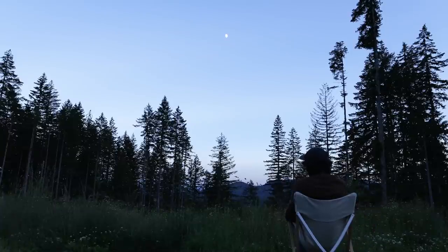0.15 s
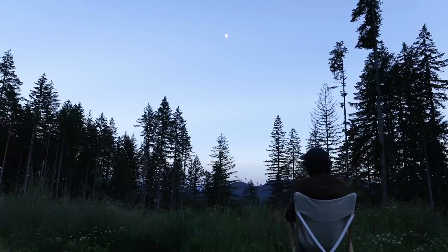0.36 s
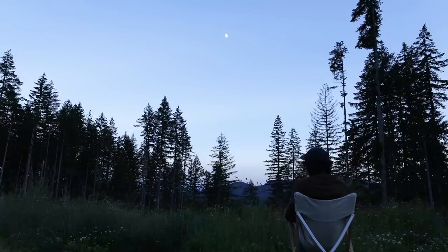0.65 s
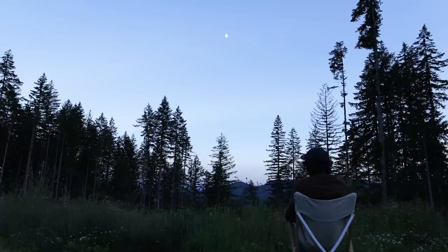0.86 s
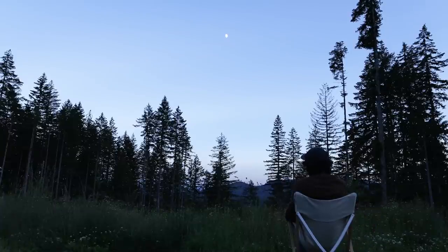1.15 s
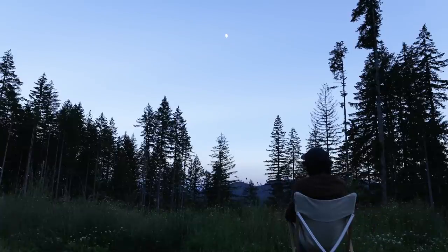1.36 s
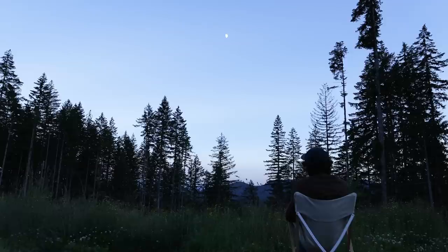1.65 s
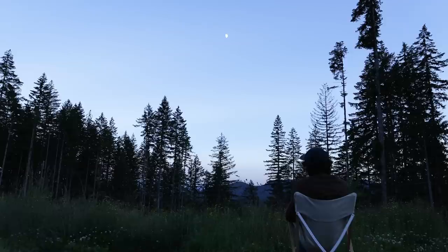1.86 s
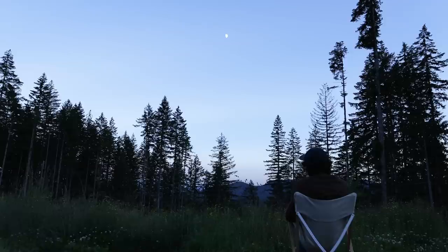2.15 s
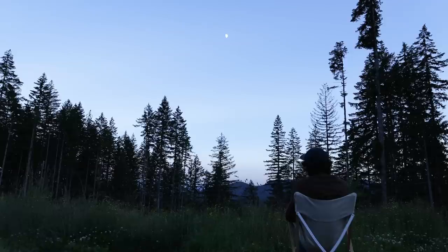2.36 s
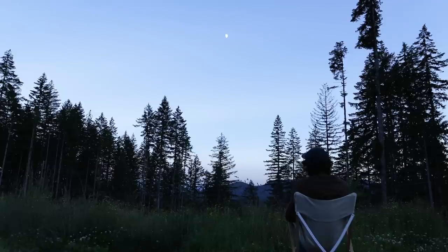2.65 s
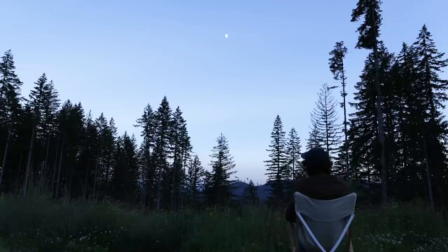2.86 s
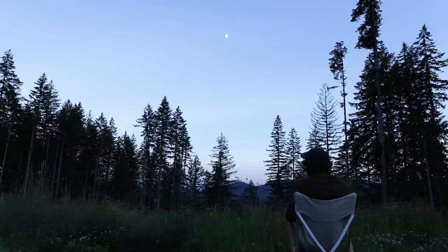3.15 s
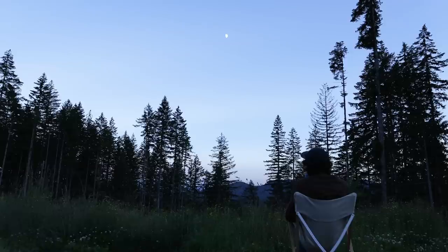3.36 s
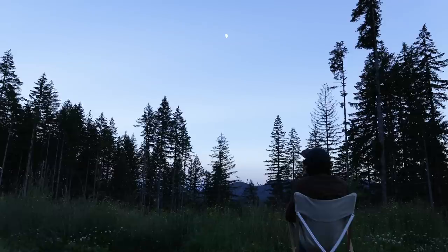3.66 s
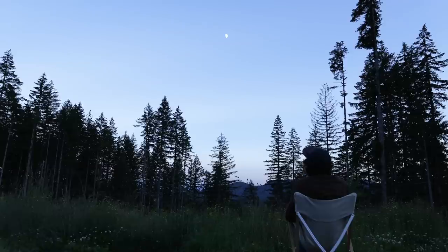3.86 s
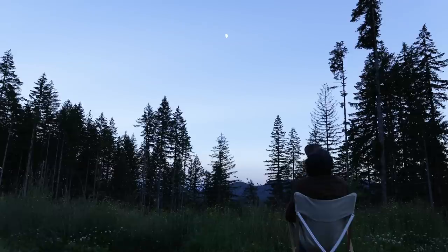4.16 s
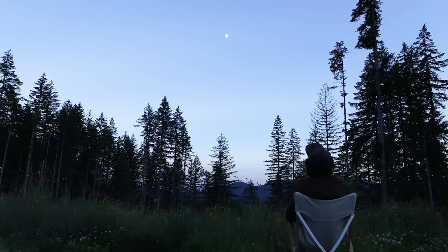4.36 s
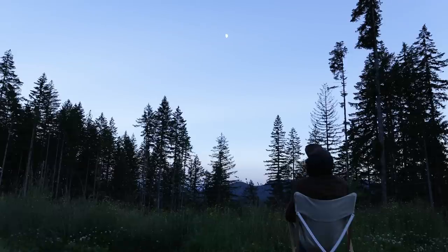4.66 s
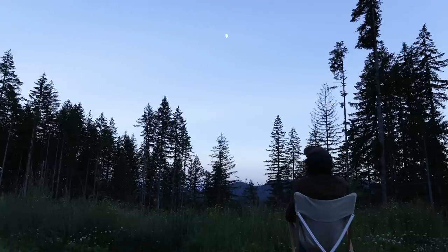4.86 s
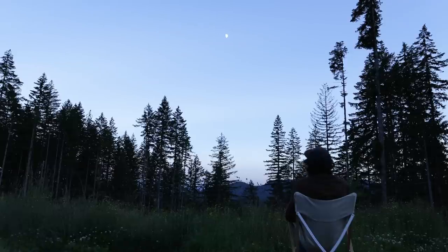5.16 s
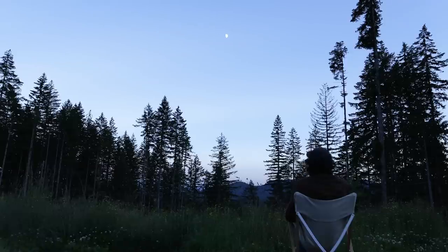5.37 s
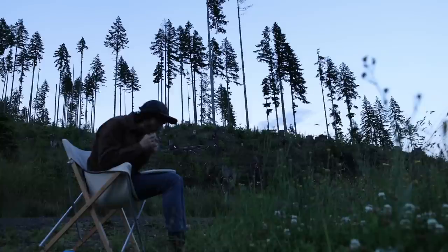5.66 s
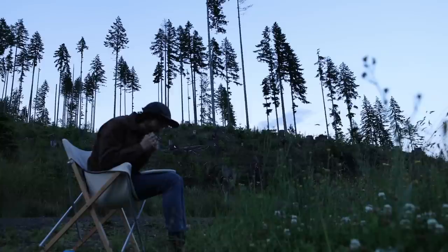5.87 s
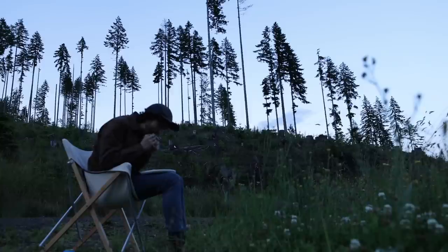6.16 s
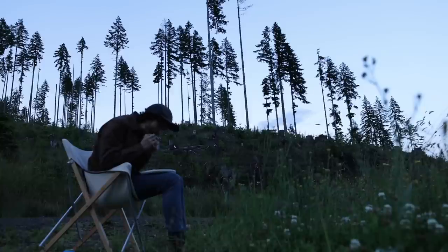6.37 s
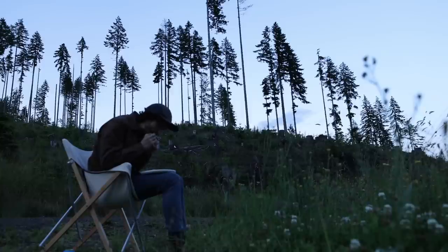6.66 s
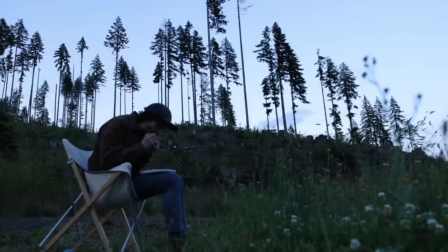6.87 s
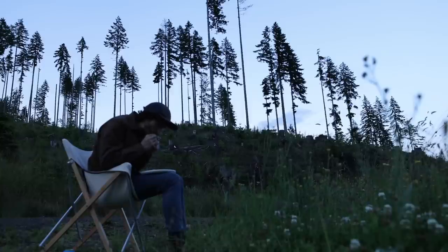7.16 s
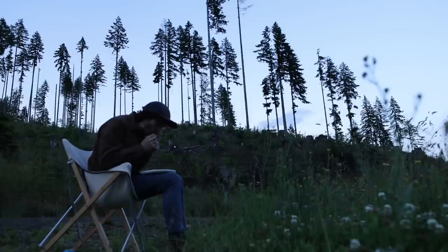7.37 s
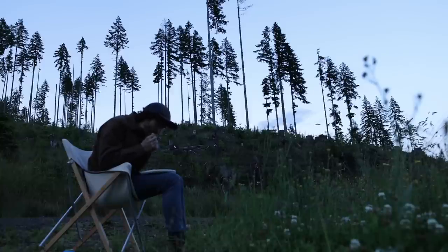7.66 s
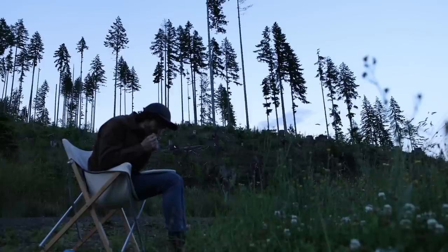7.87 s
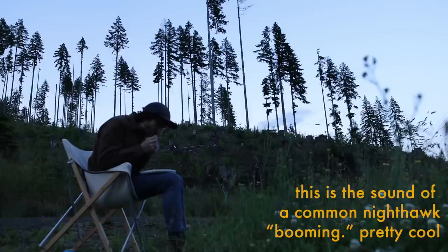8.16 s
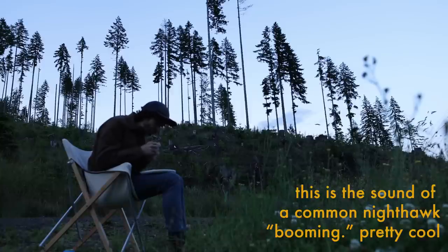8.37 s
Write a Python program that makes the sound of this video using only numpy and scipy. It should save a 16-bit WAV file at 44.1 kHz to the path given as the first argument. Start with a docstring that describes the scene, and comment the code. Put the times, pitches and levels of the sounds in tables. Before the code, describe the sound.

A sharp, close crackling snap opens over faint outdoor air, followed by scattered soft taps. Nighthawks repeat short, raspy, buzzing calls from different distances, echoing lightly off the trees and coming closer together midway. A light breeze and a far-off hum gradually grow under them. Finally the loudest call comes together with a single low boom of air rushing through a diving bird's wing feathers.

```python
"""Dusk in a forest clearing. From the start, forest air and a distant drone slowly swell, with light gusts.
Right away something small and hard snaps close by, and again near 1 s; soft taps are dotted throughout.
From 0.4 s nighthawks give buzzy peents, whistles chopped into fast pulses; the tree line answers faintly.
Just after 8 s, on the loudest call, one bird booms as air rushes through its wing feathers in a dive."""
import sys
import numpy as np
from scipy import signal
from scipy.fft import rfft, irfft, next_fast_len
from scipy.io import wavfile
from scipy.ndimage import uniform_filter1d, map_coordinates

SR = 44100
rng = np.random.default_rng(int(sys.argv[2]) if len(sys.argv) > 2 else 0)


def log_audio(samples):
    """Write samples as a 16-bit WAV file to the path given in sys.argv[1]."""
    # one column per channel
    frames = np.atleast_2d(samples).T
    # limit to full scale, then quantise
    limited = np.clip(frames, -1, 1)
    pcm = np.round(limited * 32767).astype(np.int16)
    wavfile.write(sys.argv[1], SR, pcm)


N = 375291
TIME = np.arange(N) / SR


def amp(db):
    """Decibels to gain."""
    return 10 ** (np.asarray(db) / 20)


def unit(x):
    """Scale to rms 1."""
    return x / np.sqrt(np.mean(x ** 2) + 1e-20)


def along(points, hz):
    """Read (frequency [Hz], value) points on a log axis."""
    freqs, values = np.transpose(points)
    return np.interp(np.log(hz + 1), np.log(freqs + 1), values)


def wobble(rate, size=N):
    """Smooth random modulation, rate knots a second."""
    knots = rng.standard_normal(int(size * rate / SR) + 4)
    return map_coordinates(knots, [np.arange(size) * rate / SR])


def filtered(x, response):
    """Apply a gain that depends on frequency."""
    size = next_fast_len(N + SR // 2)
    return irfft(rfft(x, size) * response(np.fft.rfftfreq(size, 1 / SR)), size)[..., :N]


def eq(x, curve):
    """Apply an EQ curve of (frequency [Hz], gain [dB]) points."""
    return filtered(x, lambda hz: amp(along(curve, hz)))


def noise(curve):
    """Noise coloured by an EQ curve, at rms 1."""
    return unit(eq(rng.standard_normal(N), curve))


def turns(hz):
    """Running phase of a pitch curve, in radians."""
    return 2 * np.pi * np.cumsum(hz) / SR


def swell(peak, rise, fall):
    """A smooth fade up to 1 and back down."""
    t = TIME - peak
    return np.exp(-(t / np.where(t < 0, rise, fall)) ** 2 / 2)


def add(track, s, sound):
    """Mix a sound into the track at time s."""
    start = max(0, round(s * SR))
    track[start:start + len(sound)] += sound[:N - start]


def echoes(x, decay, build_s):
    """Diffuse reflections that build up and die at each frequency's own speed."""
    size = int(np.clip(max(t60 for hz, t60 in decay), .1, 1) * SR)
    hz, t, bands = signal.stft(rng.standard_normal(size), SR, nperseg=256)
    tail = signal.istft(bands * amp(-60 * t / along(decay, hz)[:, None]), SR, nperseg=256)[1]
    tail *= (1 - np.exp(-np.arange(len(tail)) / SR / build_s)) ** 2
    return signal.fftconvolve(x, tail / np.linalg.norm(tail))[:N]


# Colour of the drone's rumble: (frequency [Hz], level [dB])
RUMBLE_EQ = [(20, -11.5), (50, -6.5), (85, -1), (118, 2), (150, -3), (195, 2.5), (240, -6.5), (330, -31),
             (600, -70)]
# Tones inside the rumble: (pitch [Hz], level [dB])
HUM_TONES = [(117.5, -7.5), (195, -8.5)]
# Fader ride on the drone: (time [s], level [dB])
DRONE_FADER = [(0.2, -66), (2.71, -59), (3.59, -58.5), (3.89, -54.5), (4.16, -54), (4.5, -55), (5.34, -53),
               (6.89, -52.5), (7.28, -49.5), (8.05, -50)]


def drone(trim_db=1):
    """A distant rumble with two wavering tones creeps up under the scene."""
    fader_db = np.interp(TIME, *np.transpose(DRONE_FADER))
    hum = sum(amp(db + 1.2 * wobble(10)) * unit(np.sin(turns(hz + 3 * wobble(12))))
              for hz, db in HUM_TONES)
    return amp(fader_db + trim_db) * (noise(RUMBLE_EQ) + hum)


# Colours of the far roar, air in the trees, fine hiss and gusts: (frequency [Hz], level [dB])
ROAR_EQ = [(150, -9.5), (280, 3), (450, -1), (700, -6.5), (1200, -28.5), (3000, -53.5)]
TREES_EQ = [(400, -22), (700, 0), (950, 2.5), (1300, 0.5), (1750, -1.5), (2400, -6), (3500, -10),
            (6000, -30), (12000, -58.5)]
HISS_EQ = [(1000, -23.5), (2500, 1.5), (4300, 2.5), (6000, 1), (8500, -3), (10000, -7), (11500, -12.5),
           (12600, -12), (14000, -20.5), (16000, -40.5)]
GUST_EQ = [(400, -24.5), (700, -2.5), (950, 2.5), (1250, -2.5), (1600, -9.5), (2400, -8.5), (3500, -16),
           (6000, -23), (12000, -64)]
# Light gusts in the trees: (peak time [s], rise [s], fall [s], level [dB], brightness [dB])
TREE_GUSTS = [(2.25, 0.17, .3, -68.5, -12), (3.46, 0.067, 0.052, -55.5, 5), (4.1, 0.14, 0.34, -62, -5),
              (5.12, 0.21, 0.18, -52.5, -0.5), (5.42, 0.065, 0.095, -48, 9),
              (5.62, 0.17, 0.15, -51.5, -2.5), (6.37, .13, 0.12, -50, -3), (6.62, .08, 0.11, -59.5, -13),
              (6.95, 0.33, 0.28, -55, 8.5)]


def forest_air(gust_roar_db=-9, gust_hiss_db=-23.5):
    """A bed of air in the trees grows steadily; dark gusts bring more roar, bright ones more hiss."""
    roar = amp(-66.5 + .7 * TIME)
    trees = amp(-64.5 + .58 * TIME)
    hiss = amp(-73 + 1.25 * TIME)
    gusts = np.zeros(N)
    for peak, rise, fall, db, bright_db in TREE_GUSTS:
        gust = amp(db) * swell(peak, rise, fall)
        gusts = np.hypot(gusts, gust)
        roar = np.hypot(roar, gust * amp(gust_roar_db - bright_db))
        hiss = np.hypot(hiss, gust * amp(gust_hiss_db + bright_db))
    breeze = amp(1.6 * wobble(8.3)) * (trees * noise(TREES_EQ) + gusts * noise(GUST_EQ))
    return roar * noise(ROAR_EQ) + breeze + hiss * noise(HISS_EQ)


# Hard snap cues: (time [s], level [dB], tilt [dB/octave])
SNAP_CUES = [(0.0579, -33.5, 9.5), (0.064, -25.5, 11.5), (0.0677, -24, 11), (0.0708, -26.5, 4.5),
             (.078, -31, 3.5), (0.0831, -28.5, 4.5), (0.088, -25.5, 7.5), (.097, -29, 4.5),
             (0.123, -29, -2), (0.1235, -26.5, 13.5), (0.134, -23.5, 6.5), (.1352, -5.5, 5),
             (0.1363, -7.5, -0.5), (0.922, -42, -7.5), (0.9267, -46, -8), (.935, -41.5, 11),
             (.9382, -37.5, -6), (.945, -37.5, 1.5)]
# Resonances of the small shell: (frequency [Hz], level [dB], t60 [s])
SHELL_MODES = [(813, -22, .0078), (1127, 6, .009), (2266, 5, 0.0064), (3470, 0.5, .0058),
               (4600, -9.5, .006), (6650, -15, .0057), (8300, -25, 0.015), (10070, -22.5, 0.0061)]
# Colour of a snap scattered by grass and trees: (frequency [Hz], level [dB])
SPLASH_EQ = [(300, -26), (900, -6), (2700, 8.5), (4500, -3.5), (7000, -6), (9500, -16.5), (12500, -28),
             (16000, -37)]


def snaps(crack_db=-17, splash_db=-24, splash_t60=0.11, far_db=-50, far_t60=2.0):
    """Hard contacts ring a small, well damped shell; grass and trees scatter each snap."""
    hits, scattered_power = np.zeros(N), np.zeros(N)
    t, tail_age = TIME[:SR // 20], TIME[:SR]
    tail = amp(splash_db - 60 * tail_age / splash_t60) + amp(far_db - 60 * tail_age / far_t60)
    main_hz, _, main_t60 = SHELL_MODES[1]
    for s, db, tilt in SNAP_CUES:
        ring = np.zeros(len(t))
        for k, (hz, level, t60) in enumerate(SHELL_MODES):
            mode_db = level + tilt * np.log2(hz / main_hz) + rng.normal(0, 1)
            detuned_hz = hz * rng.normal(1, 0.055)
            ring += (-1) ** k * amp(mode_db - 60 * t / t60) * np.sin(2 * np.pi * detuned_hz * t)
        crack = amp(crack_db - 60 * t / main_t60) * rng.standard_normal(len(t))
        attack = 1 - np.exp(-t / .0001)
        hit = np.tanh(2.5 * attack * (ring / np.abs(ring).max() + crack))  # saturate for bite
        add(hits, s, amp(db) * hit / np.abs(hit).max())
        add(scattered_power, s, (amp(db) * tail) ** 2)
    presence = [(200, -17), (450, -12.5), (800, 1.5), (6500, 6.5), (9500, 0), (12000, -24.5),
                (16000, -36)]
    return eq(hits, presence) + np.sqrt(scattered_power) * noise(SPLASH_EQ)


# Wind puff cues: (peak time [s], rise [s], fall [s], level [dB])
PUFF_CUES = [(.35, .05, 0.24, -54), (1.2, .04, .05, -49), (1.4, 0.046, 0.035, -58)]


def wind_puffs():
    """A few puffs of air buffet the microphone with sub-bass."""
    buffet = sum(amp(db) * swell(peak, rise, fall) for peak, rise, fall, db in PUFF_CUES)
    return buffet * noise([(10, -10.5), (25, 13), (50, 3), (100, -12.5), (300, -48), (1000, -96)])


# Soft tap cues: (time [s], peak level [dB], ring pitch [Hz], t60 [s])
TAP_CUES = [(0.36, -27.5, 1300, 0.021), (1.252, -27, 1197, 0.025), (1.717, -52, 2450, 0.013),
            (2.047, -43, 735, 0.015), (2.066, -36.5, 790, 0.017), (2.088, -30.5, 2053, 0.013),
            (4.208, -44.5, 3250, 0.024), (4.313, -45, 764, 0.012), (4.327, -40, 3200, 0.0056),
            (4.337, -46, 730, 0.028), (4.398, -38.5, 820, 0.013), (4.397, -42, 2480, 0.013),
            (4.602, -39, 940, 0.02), (4.691, -38, 975, 0.0071), (5.714, -34, 800, 0.018),
            (5.77, -33, 5230, 0.0075), (7.41, -40.5, 634, 0.025), (7.436, -40.5, 2570, 0.013)]


def taps(tick_db=-14):
    """Soft contacts: one short resonance layered with a dull tick."""
    out, t = np.zeros(N), TIME[:SR // 10]
    ticks = noise([(200, -24), (800, -8), (3000, 18), (6000, -12), (12000, -38)])
    attack = 1 - np.exp(-t / 0.00044)
    for s, db, hz, t60 in TAP_CUES:
        lowpass = signal.butter(4, min(1.8 * hz, 9000), fs=SR, output="sos")
        tick = amp(tick_db) * signal.sosfilt(lowpass, ticks[round(s * SR):][:len(t)])
        hit = (np.sin(2 * np.pi * hz * t) + tick) * attack * amp(-60 * t / t60)
        add(out, s, amp(db) * hit / np.abs(hit).max())
    return out


SCOOP_HZ, SCOOP_S, ARCH_HZ = 2358, .015, 188.4  # a call scoops up and bows over its top pitch,
SAG, STEP, STEP_S, LIFT = 0.0598, 0.306, 0.0088, .22  # sags, steps down, lifts (shares of the drop)
LEAD_IN_DB, CALL_ATTACK_S, CALL_RELEASE_S, CLOSING_DB = -31, 0.013, 0.024, 0.5
OPEN_WIDTH, WIDENING = 0.089, 0.16  # pulse width in cycles, and what it gains as the call closes
TRAIL, TRAIL_LAG_RAD = 0.15, 1.88  # each pulse trails off down its sweep
# Reverb among the trunks: (frequency [Hz], t60 [s])
TRUNK_DECAY = [(2000, 0.11), (6000, 0.34)]
# Call cues: (start [s], pitch drop time [s], end [s], level [dB], swell [dB], top pitch [Hz],
# closing pitch [Hz], buzz rate [Hz], notch spacing [Hz], second pulse [gain], tree scatter [dB])
PEENT_CUES = [ (.408, 0.654, .77, -48.5, -9, 4080, 3605, 227, 789, 0.59, -6.5),
              (1.339, 1.499, 1.597, -45.5, -6, 4230, 3515, 221, 730, 1, -24),
              (1.85, 1.945, 2.044, -60.5, 7, 4160, 3500, 226, 852, 0.29, 3),
              (2.604, 2.845, 2.982, -46.5, 5, 4566, 3490, 218, 560, 0.43, -29),
              (3.323, 3.449, 3.52, -58, -7, 4100, 3390, 228, 707, .25, -2.5),
              (3.483, 3.608, 3.684, -33.5, 0.5, 4330, 3660, 228, 600, 0.22, -15),
              (4.525, 4.758, 4.881, -47, -3, 4000, 3350, 223, 783, 0.53, -11.5),
              (4.8, 4.931, 5.026, -40.5, -4.5, 4240, 3450, 228, 712, 0.29, -3),
              (4.949, 5.075, 5.158, -31, -1.5, 4166, 3513, 224, 677, 0.29, -6),
              (5.311, 5.454, 5.575, -42, 4, 4206, 3560, 226, 760, 0.071, -0.5),
              (5.467, 5.654, 5.785, -46.5, 18, 4330, 3663, 222, 600, 0.2, -5.5),
              (6.102, 6.25, 6.37, -65, -21, 4550, 3400, 226, 900, 1, -4),
              (6.424, 6.65, 6.772, -50.5, -2.5, 4450, 3710, 224, 730, 0.25, -5),
              (6.861, 7.041, 7.128, -41.5, -2, 4410, 3515, 227, 750, 0.17, 15),
              (7.035, 7.267, 7.4, -37, 6.5, 4560, 3480, 217, 584, 0.64, -7.5),
              (8.01, 8.117, 8.206, -23.5, -5, 4370, 3720, 235, 667, 0.16, -17.5)]


def peents(quicken=0.054, jitter=.02, sweep_hz=680, steepen=.55, crest_hz=4700, hz_per_rad=560,
           wander_hz=30, rough_hz=75, leak=0.012, rasp_db=-29, overtone_db=-41, far_edge_hz=3950):
    """A nighthawk's whistle, chopped into a fast buzz whose pulses merge as the call drops and closes."""
    faintest_db = min(cue[3] for cue in PEENT_CUES)
    out = np.zeros(N)
    for cue in PEENT_CUES:
        start, drop, end, db, swell_db, top_hz, close_hz, buzz_hz, notch_hz, doubling, scatter_db = cue
        size = int((end - start) * SR)
        age = TIME[:size]
        opened = np.clip(age / (drop - start), 0, 1)
        closed = np.clip((start + age - drop) / (end - drop), 0, 1)
        harshness = (1 - closed) ** 0.73
        merged = np.clip((1 - harshness) * 2, 0, 1)

        fall = STEP * np.exp(-closed * (end - drop) / STEP_S) + (1 - STEP) * (1 - closed) ** 2.1
        height = (1 - SAG * opened ** 2) * fall + LIFT * closed ** 6
        pitch_hz = close_hz + (top_hz - close_hz) * height - SCOOP_HZ * np.exp(-age / SCOOP_S)
        pitch_hz += ARCH_HZ * (np.sin(np.pi * opened ** 0.692) - .6 * fall)

        cycle = turns(buzz_hz * (1 + quicken * merged + jitter * wobble(110, size)))
        width_rad = 2 * np.pi * (OPEN_WIDTH + WIDENING * closed)
        pulse, trail = (np.exp((np.cos(cycle - lag) - 1) / width_rad ** 2) for lag in (0, TRAIL_LAG_RAD))
        gate = leak + pulse + TRAIL * (1 - merged) * trail
        gate /= np.sqrt(np.abs(uniform_filter1d(gate ** 2, size=390)) + 1e-9)  # hold the power steady
        release = np.tanh((end - start - age) / CALL_RELEASE_S)
        envelope = release * amp(LEAD_IN_DB * np.exp(-age / CALL_ATTACK_S) + CLOSING_DB * merged)
        pulses = gate * envelope * amp(0.91 * wobble(119.1, size))

        # the pitch dives in each pulse and climbs back in the gap; low calls sound later in that dive
        dive_rad = (crest_hz - top_hz) / hz_per_rad
        skewed_cycle = cycle + steepen * (1 - merged) * np.sin(cycle)
        pitch_hz += sweep_hz * harshness * (np.cos(skewed_cycle + dive_rad) - np.cos(dive_rad))
        pitch_hz += wander_hz * wobble(25.3, size) + rough_hz * harshness * wobble(500, size)
        phase = turns(pitch_hz)
        rasp = amp(rasp_db) * harshness * wobble(6000, size) * np.sin(phase)
        overtone = amp(overtone_db) * np.sin(2 * phase)

        # fainter birds are farther off and lose the top of the buzz
        edge_hz = np.clip(far_edge_hz + 42 * (db - faintest_db), top_hz, 9000)
        lowpass = signal.butter(6, edge_hz, fs=SR, output="sos")
        call = signal.sosfiltfilt(lowpass, pulses * np.sin(phase)) + pulses * (rasp + overtone)
        # each pulse is doubled, which hollows the buzz like a comb filter
        call += doubling * np.pad(call, (round(SR / notch_hz), 0))[:size]
        fader = amp(db + swell_db * np.linspace(-.5, .5, size))
        call = fader * unit(call) / np.sqrt(1 + amp(2 * scatter_db))
        add(out, start, call)
        # birds behind the trees arrive blurred
        add(out, start, amp(scatter_db) * echoes(call, TRUNK_DECAY, build_s=0.0057))
    return out


BOOM_START_S, BOOM_END_S = 8.119, 8.425  # the wings bend into the air stream and let go
FLUTTER_HZ, SLOWING_HZ_PER_S = 452.6, 135
CATCH_HZ, CATCH_S = 89.9, 0.0084  # the feathers start sharp and settle at once
FLUTTER_DB, FLUTTER_ATTACK_S, FLUTTER_RELEASE_DB_PER_S = -29, 0.015, 165
SURGE_S, SURGE_WIDTH_S, SURGE_DB = 8.166, 0.029, 7  # hardest pull at the bottom of the dive
RUSH_DB, RUSH_ATTACK_S, RUSH_FADE_DB_PER_S, RUSH_RELEASE_DB_PER_S = -33.5, 0.0027, 18, 29
# Fluttering feathers: (pitch [ratio to the flutter rate], level [dB], unsteadiness [share of pitch])
FEATHER_VOICES = [(1, 2, .055), (.857, -11, 0.0305), (.743, -11, 0.026), (1.2, -12, 0.055)]
# Colour of the air rushing through the wings: (frequency [Hz], level [dB])
RUSH_EQ = [(250, -35), (330, -2.5), (520, -5.5), (720, -3), (850, -9.5), (1230, -6.5), (1400, -23),
           (1700, -12), (1920, -22), (2200, -20.5), (3000, -38), (8000, -62)]


def wing_boom(second_db=-21, third_db=-24, chop=0.56):
    """Feathers flutter at neighbouring rates and chop the rushing air; the pitch sinks as the bird slows."""
    age = np.maximum(TIME - BOOM_START_S, 0)
    released = np.maximum(TIME - BOOM_END_S, 0)
    flutter_hz = FLUTTER_HZ - SLOWING_HZ_PER_S * age + CATCH_HZ * np.exp(-age / CATCH_S)
    flutter = np.zeros(N)
    for ratio, db, unsteady in FEATHER_VOICES:
        phase = turns(ratio * flutter_hz * (1 + unsteady * wobble(190)))
        voice = np.sin(phase) + amp(second_db) * np.sin(2 * phase) + amp(third_db) * np.sin(3 * phase)
        flutter += amp(db + 1.6 * wobble(70)) * voice
    flutter = unit(flutter)
    chopped_air = rng.standard_normal(N) * (1 + chop * flutter) * amp(2.7 * wobble(190))
    rush = unit(eq(chopped_air, RUSH_EQ))
    surge_db = SURGE_DB * np.exp(-((TIME - SURGE_S) / SURGE_WIDTH_S) ** 2)
    flutter *= amp(FLUTTER_DB + surge_db - FLUTTER_RELEASE_DB_PER_S * released)
    rush *= amp(RUSH_DB - RUSH_FADE_DB_PER_S * age - RUSH_RELEASE_DB_PER_S * released)
    return flutter * np.tanh(age / FLUTTER_ATTACK_S) ** 2 + rush * np.tanh(age / RUSH_ATTACK_S) ** 2


# Reverbs of the tree line and the close surroundings: (frequency [Hz], t60 [s])
FOREST_DECAY = [(200, 2.4), (1000, 0.29), (4000, 2.14), (7000, 2.7), (14000, 1.3)]
NEARBY_DECAY = [(300, 0.1), (2500, 0.05), (8000, 0.048), (15000, 0.017)]


def scene(bird_send_db=-21, wing_send_db=-18, tap_send_db=-18, side_db=-39, side_noise_db=-80):
    """The mix: birds overhead and contacts close by on a bed of air, centred with barely any width."""
    birds, wings, knocks = peents(), wing_boom(), taps()
    far = echoes(amp(bird_send_db) * birds + amp(wing_send_db) * wings, FOREST_DECAY, build_s=0.0058)
    close = snaps() + knocks + amp(tap_send_db) * echoes(knocks, NEARBY_DECAY, build_s=0.011)
    mid = drone() + forest_air() + wind_puffs() + close + birds + wings + far
    side_noise = noise([(25, -0.5), (100, -6.5), (400, 4), (6000, 7.5), (11000, 0), (14000, -23)])
    side = amp(side_db) * echoes(mid, NEARBY_DECAY, build_s=.001) + amp(side_noise_db) * side_noise
    return np.array([mid + side, mid - side])


def record(dry, ceiling=.92, top_hz=16000):
    """Master chain: a soft clip rounds off the highest peak, then a brick-wall low-pass."""
    clipped = dry / (1 + np.abs(dry / ceiling) ** 8) ** (1 / 8)
    return filtered(clipped, lambda hz: hz < top_hz)


dry = scene()
out = record(dry)
log_audio(out)
```